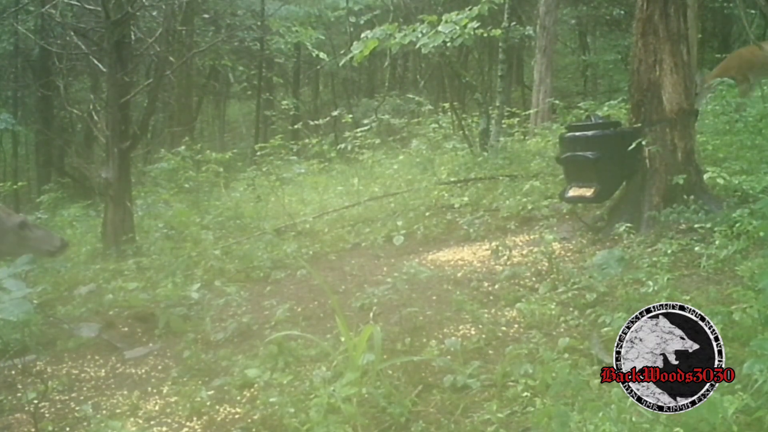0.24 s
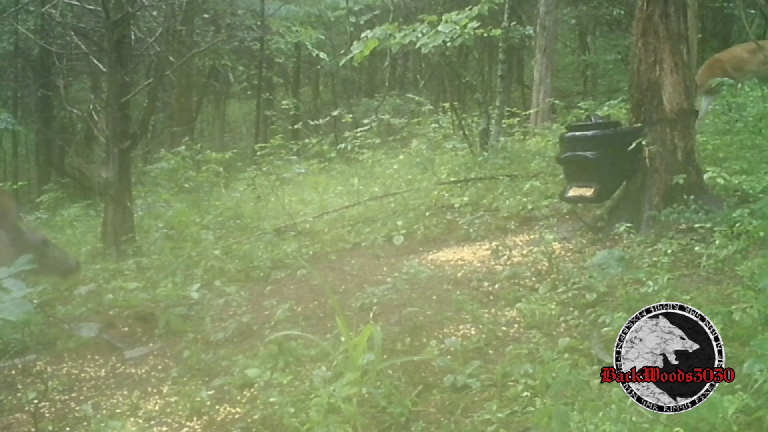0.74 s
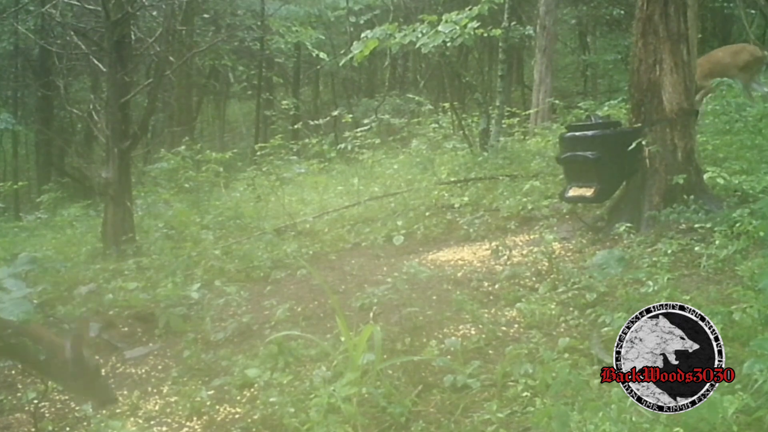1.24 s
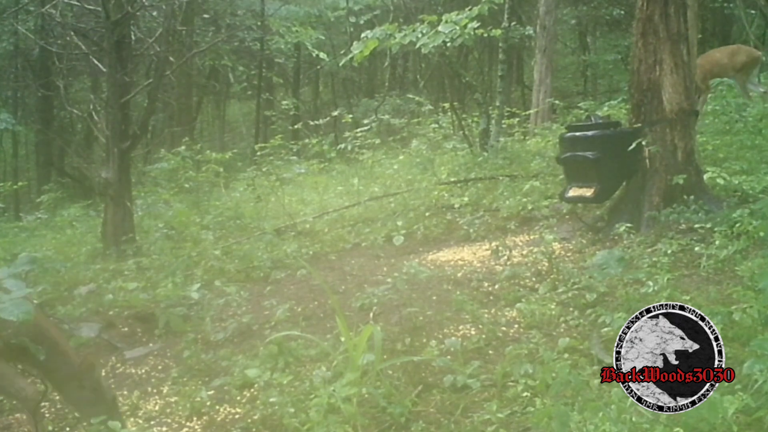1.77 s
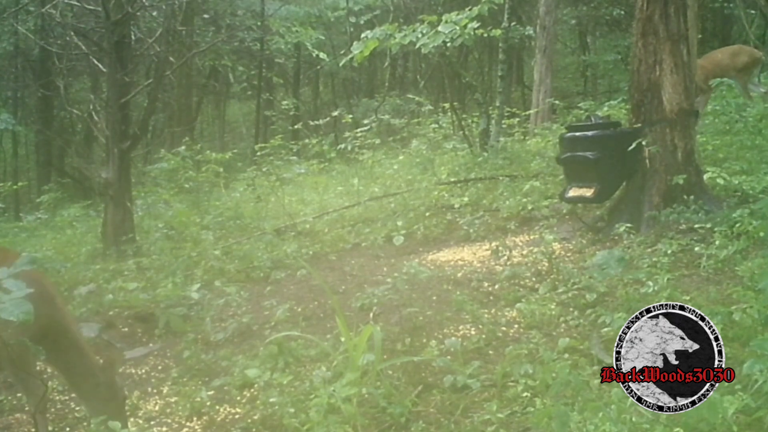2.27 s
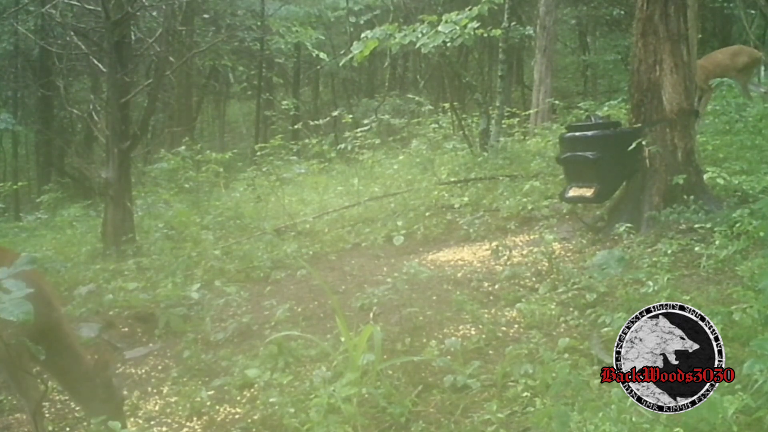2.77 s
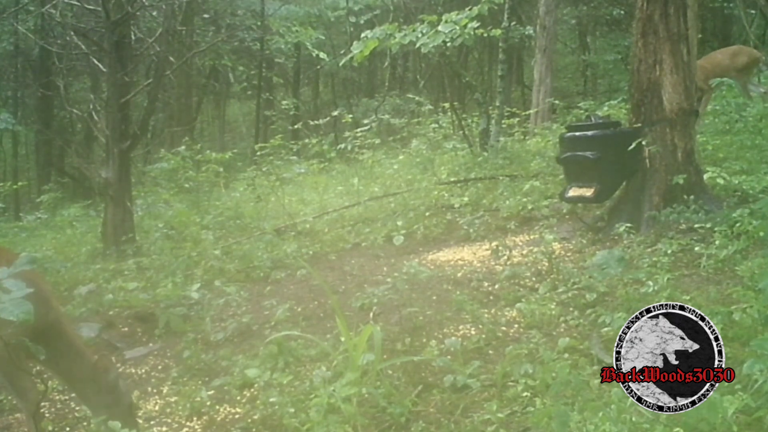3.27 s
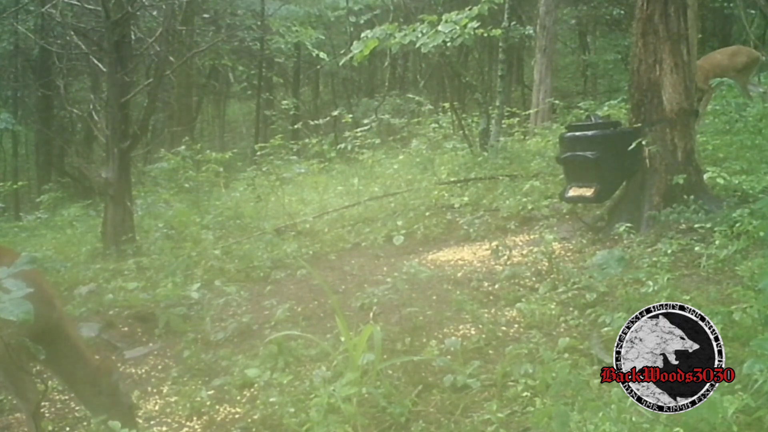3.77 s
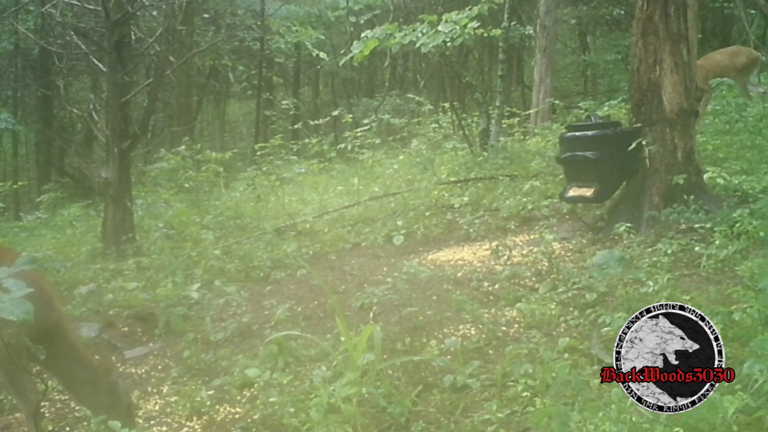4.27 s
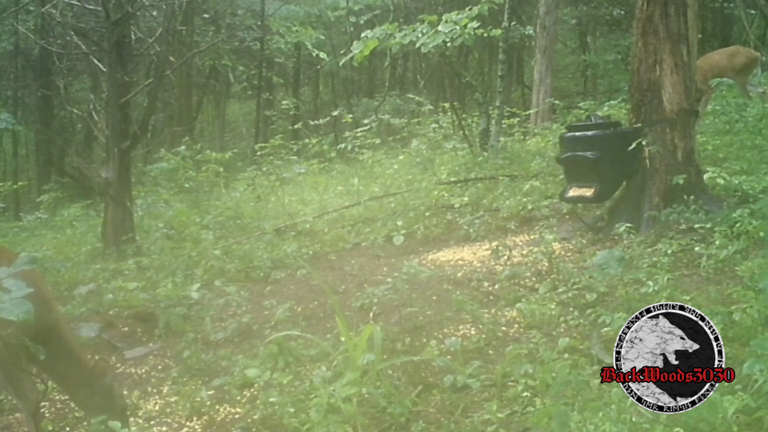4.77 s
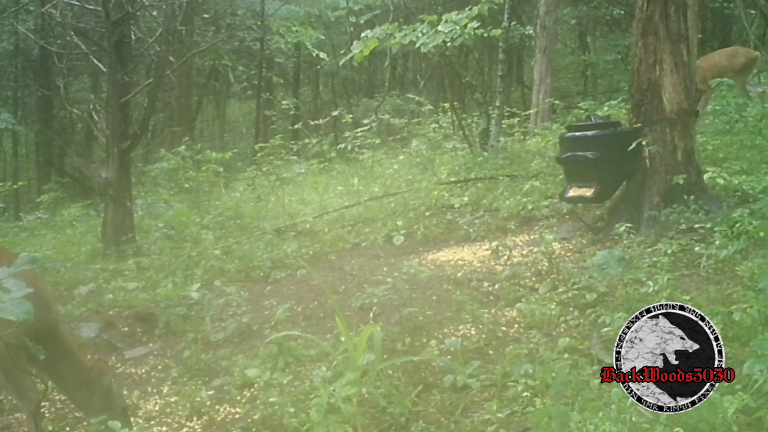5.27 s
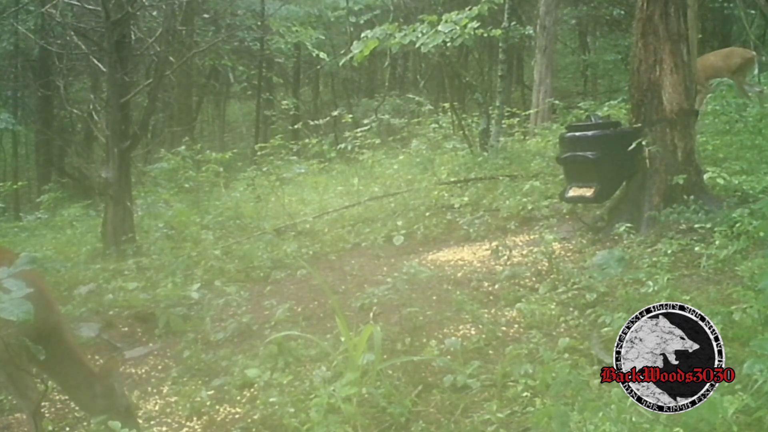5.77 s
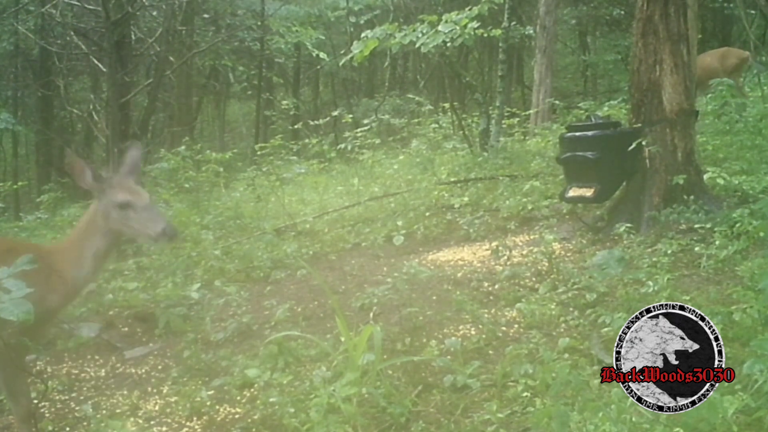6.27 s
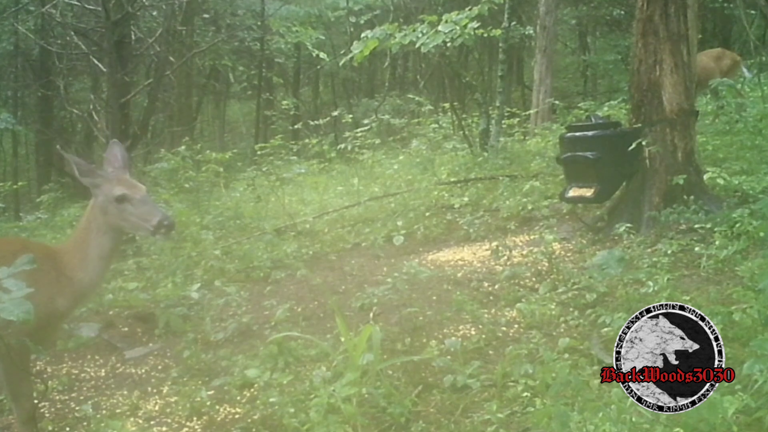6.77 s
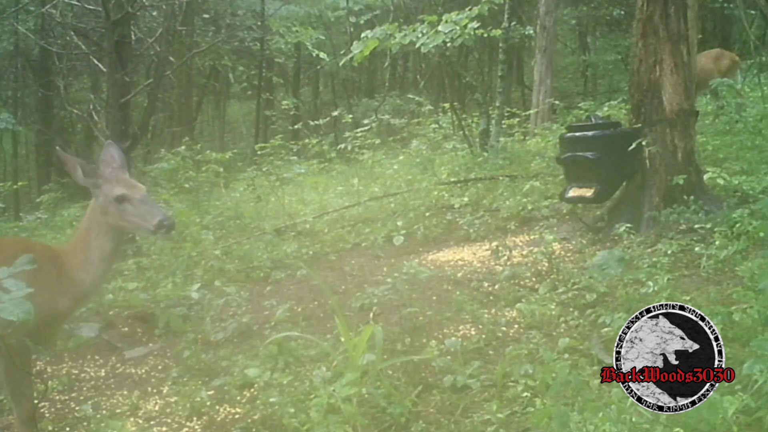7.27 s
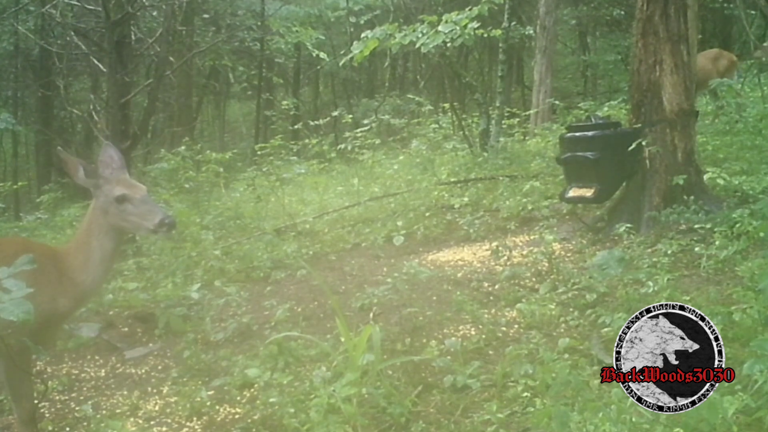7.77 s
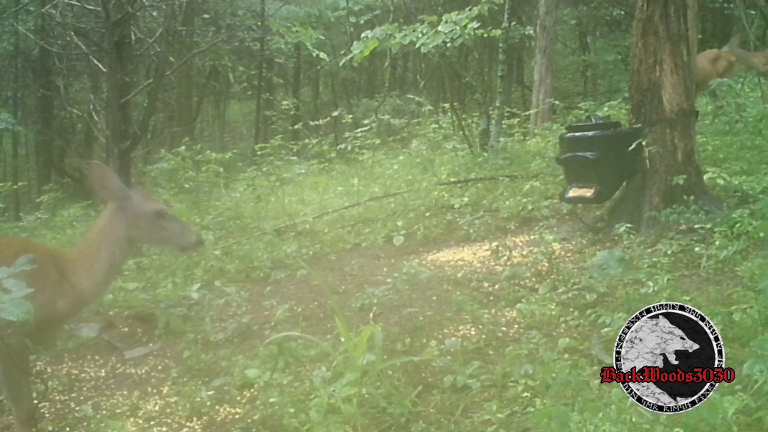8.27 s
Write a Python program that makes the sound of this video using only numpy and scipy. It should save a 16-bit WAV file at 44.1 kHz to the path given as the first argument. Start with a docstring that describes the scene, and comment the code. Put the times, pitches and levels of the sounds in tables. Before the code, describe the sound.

Heard from inside a plastic housing strapped to a tree: dense rain patter on leaves, dull and slightly muffled, with scattered sharp plops. An early cluster of very loud, distorted plastic knocks stands out, then clear rising bird whistles and a fast repeated trill with woodland echo. Faint far notes and a brief distant buzz pass, a lighter knock lands midway, and the birds call again near the close.

```python
"""Woodland in steady rain, heard by a microphone in a plastic housing strapped to a tree.
Drops are impulses and noise bursts filtered to leaf pitches, over a wash of shaped noise.
Big drips excite the damped modes of the housing, and the strongest overload the input.
Birds are frequency-modulated sines: a near whistler, a trill, far notes and rising chips.
Random decaying taps add echoes among the trunks; a faint far buzz is throbbing band noise."""
import sys
import numpy as np
from scipy import signal
from scipy.fft import rfft, irfft
from scipy.io import wavfile
from scipy.ndimage import uniform_filter1d

SR = 44100
rng = np.random.default_rng(int(sys.argv[2]) if len(sys.argv) > 2 else 0)


def bounce(signal):
    """Save signal as a 16-bit WAV file at the path given by the first command-line argument."""
    frames = np.transpose(np.atleast_2d(signal))
    limited = np.clip(frames, -1, 1)
    pcm = np.round(limited * 32767).astype(np.int16)
    wavfile.write(sys.argv[1], SR, pcm)


N = 375291  # length [samples]


def gain_of(db):
    """Logarithmic level: converts decibels to an amplitude ratio."""
    return 10 ** (np.asarray(db) / 20)


def evened(x):
    """Power normalisation: scales a signal to rms 1."""
    return x / np.sqrt(np.mean(x ** 2) + 1e-20)


def read(points, hz):
    """Interpolation on a log-frequency axis of a table of (frequency, value)."""
    point_hz, value = np.transpose(points)
    return np.interp(np.log(hz + 1), np.log(point_hz + 1), value)


def add(mix, s, sound):
    """Superposition: adds a sound to the mix at s seconds, cut at the end of the mix."""
    part = mix[round(s * SR):][:len(sound)]
    part += sound[:len(part)]


def band(x, lo_hz, hi_hz):
    """Causal Butterworth band-pass along the last axis."""
    sos = signal.butter(2, [lo_hz, hi_hz], "bandpass", fs=SR, output="sos")
    return signal.sosfilt(sos, x)


def drop(hz, splash_db, thud_db, t60, noise):
    """Impulse excitation: a tick and decaying spatter drive a leaf ring, a bright splash and a dull thud."""
    leaf_dull_hz, ring_octaves = 4200, 0.49  # low-pass of ring and thud; reach of the ring below hz
    t = np.arange(len(noise)) / SR
    hit = 0.13 * noise * gain_of(-60 * t / max(t60, .003))
    hit[0] = 1  # the tick
    dull = signal.lfilter(*signal.butter(2, leaf_dull_hz, fs=SR), hit)
    ring = band(dull, hz / 2 ** ring_octaves, hz * 1.11)
    splash = band(hit, 3500, 7500)
    thud = band(dull, 408, 1950)
    leaf = ring / abs(ring).max()
    return leaf + gain_of(splash_db) * evened(splash) + gain_of(thud_db) * evened(thud)


def near_drops():
    """Discrete impacts: the loudest single drops, on near leaves."""
    # Drops on near leaves: (time [s], ring peak level [dB], ring pitch [Hz],
    # treble splash level [dB rms], low thud level [dB rms])
    drops = [(0.0814, -27, 2720, -70, -63), (0.3519, -20.5, 2620, -60, -47),
             (0.7286, -27, 2840, -65, -45.5), (0.7977, -27, 3040, -58, -42.5),
             (0.9291, -37, 2900, -66, -46), (1.055, -28, 3000, -73, -52), (1.1124, -45, 2330, -74, -47.5),
             (1.1808, -27, 2630, -73, -47), (1.3198, -20.5, 2740, -71, -45), (1.3946, -25, 2630, -61, -52),
             (1.54, -26, 2280, -59, -42), (1.7472, -51, 2180, -62, -47.5), (2.0012, -29, 2700, -68, -46),
             (2.0921, -23, 2760, -55.5, -53), (2.159, -29, 2900, -65, -52), (2.2548, -38, 2770, -66, -57),
             (2.3777, -22, 3230, -59, -49), (2.4864, -50, 3300, -63, -51), (2.5052, -39, 3200, -57, -35.5),
             (2.6458, -43, 3240, -71, -48), (2.7637, -27, 1850, -73, -45), (2.7925, -23, 2740, -75, -44),
             (2.8398, -30, 1890, -72, -53), (2.9026, -29, 3000, -68, -60), (3.0834, -24, 3000, -55, -45.5),
             (3.2984, -24.5, 3100, -60, -46.5), (3.416, -24, 2900, -69, -46),
             (3.8598, -31, 2500, -65, -48.5), (4.2138, -35, 2520, -73, -48), (4.279, -36, 2410, -58, -50),
             (4.2941, -16.5, 3080, -67, -41), (4.342, -32, 1930, -72, -49), (4.3657, -32, 2780, -68, -53),
             (4.5032, -31, 2740, -75, -52), (4.832, -44, 3090, -67, -48.5), (5.346, -35, 2950, -68, -53),
             (5.5623, -32, 3030, -63, -45.5), (5.7909, -24, 2240, -59, -37), (5.8025, -26, 2830, -58, -52),
             (5.9391, -17.5, 2280, -72, -41.5), (5.9908, -34, 2910, -72, -52),
             (6.0427, -45, 3070, -67, -46.5), (6.1, -27, 2760, -68, -46), (6.194, -29, 2910, -70, -58),
             (6.3538, -25.5, 2900, -58, -47), (6.6249, -34, 2540, -64, -49), (6.9432, -28, 2400, -70, -48),
             (7.5517, -19.5, 3120, -70, -44), (7.5661, -24, 2130, -67, -38)]
    out = np.zeros(N)
    noise = rng.standard_normal((len(drops), 800))
    for (s, db, hz, splash_db, thud_db), row in zip(drops, noise):
        sound = drop(hz, splash_db - db, thud_db - db, t60=0.013, noise=row)
        add(out, s, gain_of(db) * sound)
    return out


def patter(per_s, db, spread_db, count=24):
    """Random arrivals: small drops, a few of them large, each convolved with one of count leaf sounds."""
    arrives = rng.random(N) < per_s / SR
    size = gain_of(db + spread_db * np.minimum(rng.exponential(1, N), 4)) * arrives
    leaf = rng.integers(0, count, N)
    high_hz, low_hz = rng.uniform(2550, 3100, count), rng.uniform(705, 1900, count)
    pitch = np.where(rng.random(count) < .8, high_hz, low_hz)
    out = np.zeros(N)
    for k, hz in enumerate(pitch):
        tap = drop(hz, splash_db=-71, thud_db=-16.0, t60=0.025, noise=rng.standard_normal(800))
        out += signal.oaconvolve(size * (leaf == k), tap)[:N]
    return out


def housing():
    """Modal synthesis: each contact is a short splat that rings the housing; a big drip makes several."""
    # Contacts of drips on the housing: (time [s], knock peak level [dB],
    # spectral tilt about 2 kHz [dB per octave], best-struck mode [Hz], its lift [dB],
    # initial spray level relative to the knock peak [dB rms])
    contacts = [(0.757, -32, 2, 575, 16.5, -35), (0.933, -37, -3.5, 474, 22, -35),
                (1, -36, -4, 1265, 15, -35), (1.171, -32, 1.5, 575, 23, -35), (1.489, -26, 0, 2000, 6, -25),
                (1.5104, 12, 2, 3200, 11.5, -35), (1.513, 5.5, -2, 1088, 6.5, -35),
                (1.5155, -4.5, 12, 1790, 4, -25), (1.6134, -6, 0, 3200, 14, -18.5),
                (1.6154, -8, 5.5, 2340, 4, -42), (1.6945, 2, -3, 2670, 9, -17),
                (1.6962, -5.5, -2, 1265, 20, -29), (1.792, -31.5, -4, 1010, 12, -14),
                (2.392, -19.5, 1, 1265, 13.5, -30), (2.554, -26.5, -2.5, 575, 2, -35),
                (2.984, -32.5, -4.5, 1088, 9, -35), (3.069, -33, -1, 575, 12, -37),
                (3.95, -35, -0.5, 575, 20, -35), (5.0934, -19.5, -5, 3200, 12, -15.5),
                (5.0994, -11, -4.5, 752, 19, -21), (5.1002, -17.5, -6.5, 2500, 26, -39),
                (5.519, -38, -6, 575, 17, -35), (6.494, -39, -7, 575, 7, -41)]
    # Damped modes of the housing: (frequency [Hz], relative level [dB], decay time t60 [s])
    modes = [(270.4, -31, 0.5), (474, -16, 0.134), (575, -2.5, 0.098), (698, -3, 0.045), (770, -18, 0.092),
             (807, -14, 0.046), (1310, 5.5, 0.0187), (3900, -32, .015), (1088, 5.5, 0.036),
             (1265, -14, 0.13), (1530, 12.5, 0.013), (1670, -3, 0.043), (1790, 4, 0.037), (2340, -4, 0.036),
             (2500, 6.5, 0.024), (2700, 0.5, 0.0083), (2790, 9, 0.015), (3027, -23, 0.0098),
             (3200, 14.5, 0.011), (3580, -12, 0.036), (4290, 2, 0.018), (3000, 16.5, 0.016),
             (1900, -12, 0.026)]
    splat_s = 0.0017  # decay constant of the splat
    thump_db, thump_s = -26, 0.00086  # scale of a pulse shape that peaks near 0.46; its time constant
    out, t = np.zeros(N), np.arange(SR // 4) / SR
    noise = rng.standard_normal((len(contacts), 600))
    for (s, db, tilt, struck_hz, lift_db, spray_db), row in zip(contacts, noise):
        ring = np.zeros(len(t))
        for k, (hz, level_db, t60) in enumerate(modes):
            # the spot struck favours some modes
            near_db = lift_db * np.exp(-(np.log2(hz / struck_hz) / 0.094) ** 2)
            sign = (-1) ** k if hz < 2100 else 1  # low modes alternate in sign along the table
            height = sign * gain_of(level_db + near_db + tilt * np.log2(hz / 2000))
            ring += height * gain_of(-60 * t / t60) * np.sin(2 * np.pi * hz * t)
        splat = 1.1 * row * np.exp(-t[:600] / splat_s) / np.sqrt(splat_s * SR)
        splat[0] = 1  # the splat opens with one sharp tick
        soft_ring = ring * (1 - np.exp(-t / 0.00028))  # water lands softly
        knock = signal.oaconvolve(soft_ring, splat)
        spray = evened(band(row, 2400, 5600)) * gain_of(spray_db - 60 * t[:600] / 0.016)
        # the whole housing is pushed back
        thump = (t / thump_s) * (2 - t / thump_s) * np.exp(-t / thump_s)
        add(out, s, gain_of(db) * knock / abs(knock).max())
        add(out, s, gain_of(db) * spray)
        add(out, s, gain_of(db + thump_db) * thump)
    return out


def whistle(rows, edge):
    """Frequency modulation: a sine follows rows of (time [s], pitch [Hz], level [dB rms])."""
    s, hz, db = np.transpose(rows)
    t = np.arange(s[0], s[-1], 1 / SR)
    tone = np.sin(2 * np.pi * np.cumsum(np.interp(t, s, hz)) / SR)
    envelope = np.sqrt(2) * gain_of(np.interp(t, s, db))
    return s[0], envelope * tone * signal.windows.tukey(len(t), edge)


def near_bird():
    """Pitch glides: whistles scoop up, slide to a held pitch and fade a little; two quick flicks fall."""
    # Whistles: (start [s], length [s], level [dB rms], first pitch [Hz], held pitch [Hz],
    # slide time [s], change of level by the end [dB])
    whistles = [(2.364, .135, -33, 3270, 3520, .09, -9), (2.503, .25, -38, 3300, 3570, .03, -8),
                (7.514, .255, -35, 3300, 3670, .14, -7)]
    # Falling flicks: (start [s], level at the start [dB rms])
    flicks = [(2.613, -43), (7.76, -44)]
    scoop_hz, scoop_s, rise_s = 390, 0.0056, 0.016  # depth and time constant of the scoop; onset
    sag_hz_per_s, vibrato_hz, vibrato_per_s = 180, 14, 23  # the held pitch sinks and wavers
    flick_from_hz, flick_to_hz, flick_s, flick_swell_db = 3500, 2500, 0.0109, 6
    out = np.zeros(N)
    for s, length, db, first_hz, held_hz, slide_s, fade_db in whistles:
        t = np.arange(0, length, .002)
        slide = np.sin(np.pi / 2 * np.minimum(t / slide_s, 1)) ** 2
        hz = first_hz + (held_hz - first_hz) * slide - scoop_hz * np.exp(-t / scoop_s)
        hz += vibrato_hz * np.sin(2 * np.pi * (vibrato_per_s * t + rng.random()))
        hz -= sag_hz_per_s * t
        level_db = db + fade_db * t / length + 20 * np.log10(np.clip(t / rise_s, .1, 1))
        add(out, *whistle(np.transpose([s + t, hz, level_db]), edge=0.027))
    for s, db in flicks:
        flick = [(s, flick_from_hz, db), (s + flick_s, flick_to_hz, db + flick_swell_db)]
        add(out, *whistle(flick, edge=0.19))
    return out


def trill(strokes):
    """Periodic repetition of a syllable: a short high note, a fast fall, a low upstroke."""
    # Three strokes of a syllable, each a list of
    # (time from syllable start [s], mean pitch [Hz], level relative to the effort [dB])
    syllable = [
        [(-.028, 4880, -1), (-.015, 5050, -17), (0, 5200, -12)],
        [(0, 7300, -14), (.013, 6300, -2.5), (.021, 5200, 1), (.025, 3900, 10.5), (.032, 2980, -7)],
        [(.038, 2394, 0), (.045, 2782, 11), (.052, 3200, 10), (.06, 3290, 13)],
    ]
    # Trills: (first syllable [s], effort [dB], syllables [count], of them with an upstroke [count])
    trills = [(2.982, -54, 7, 6), (8.134, -55, 4, 4)]
    syllable_s = .0935  # spacing of syllables
    tiring_db, upstroke_db = -0.47, 4  # change per syllable, lift of the upstroke
    out = np.zeros(N)
    for first, effort_db, syllables, closed in trills:
        for n in range(round(syllables)):
            for k in strokes:
                waver = [1, rng.normal(1, 0.015), 1]  # no two strokes have quite the same pitch
                start, tone = whistle(np.array(syllable[k]) * waver, edge=0.12)
                level_db = effort_db + n * tiring_db + upstroke_db * (k == 2)
                if k < 2 or n < round(closed):
                    add(out, first + n * syllable_s + start, gain_of(level_db) * tone)
    return out


def far_birds():
    """Slow frequency modulation: faint even notes slide through three pitches."""
    # Far notes: (start [s], length [s], level [dB rms], pitch at start, middle and end [Hz])
    notes = [(2.759, 0.12, -48, 1845, 1897, 1900), (4.05, 0.19, -50, 2660, 2520, 2500),
             (4.46, .07, -70, 5890, 5780, 5640), (7.89, .13, -50.5, 1860, 1918, 1800),
             (8.0, 0.086, -47.5, 1345, 1693, 1700), (8.064, 0.0806, -48, 1592, 1420, 1339),
             (8.16, 0.049, -50, 1358, 1335, 1220), (8.478, 0.037, -49, 1370, 1520, 1660)]
    out = np.zeros(N)
    for s, length, db, *pitches in notes:
        rows = [(s + k * length / 2, hz, db) for k, hz in enumerate(pitches)]
        add(out, *whistle(rows, edge=0.14))
    return out


def chips():
    """Rapid upward chirps: thin steep rises, loudest a third of the way, mostly heard as echoes."""
    # Chips: (start [s], length [s], loudest level [dB rms], end pitch [Hz])
    chirps = [(4.228, .035, -61, 7860), (8.068, .029, -56, 8000)]
    from_hz, ends_db = 5600, -12  # start pitch; level at both ends relative to the loudest
    out = np.zeros(N)
    for s, length, db, end_hz in chirps:
        rows = [(s, from_hz, db + ends_db),
                (s + length / 3, (from_hz + end_hz) / 2, db),
                (s + length, end_hz, db + ends_db)]
        add(out, *whistle(rows, edge=0.04))
    return out


def woods(x, wet_db):
    """Multiple scattering by trunks: taps of random sign, decaying at a rate that depends on frequency."""
    # Echoes last longest up to 1 kHz, shortest near 3.5 kHz, a little longer at 7 kHz:
    # (frequency [Hz], decay time t60 [s])
    decay = [(1000, 3.2), (3500, 0.65), (7000, 0.91)]
    taps = np.zeros(SR)
    at = np.arange(300, SR - 20, 20) + rng.integers(0, 20, (SR - 301) // 20)
    taps[at] = rng.choice([-1., 1.], len(at))
    hz, t, z = signal.stft(taps, SR, nperseg=256)
    fading = gain_of(-60 * t / read(decay, hz)[:, None])
    tail = signal.istft(z * fading, SR, nperseg=256)[1]
    echoes = signal.fftconvolve(x, tail / np.linalg.norm(tail))[:N]
    return x + gain_of(wet_db) * echoes


def buzz():
    """Amplitude modulation: a distant insect or bird, blurred to a band of throbbing hiss."""
    # Start, loudest moment and end of the buzz: (time [s])
    times = (4.55, 4.85, 5.05)
    lo_hz, hi_hz, loudest_db, ends_db = 4260, 5200, -64, -73
    t = np.arange(N) / SR
    hiss = band(band(rng.standard_normal(N), lo_hz, hi_hz), lo_hz, hi_hz)
    throb = 1 + 0.21 * np.sin(2 * np.pi * 24 * t)
    level_db = np.interp(t, times, [ends_db, loudest_db, ends_db], left=-120, right=-120)
    return evened(hiss) * throb * gain_of(level_db)


def wash(patchy_db, flicker_db):
    """Noise by random short-time spectra: countless far drops, with drifting patches and shared flicker."""
    # Rain wash and microphone hiss: (frequency [Hz], relative spectral level [dB per Hz])
    spectrum = [(15, -48), (25, 0.5), (102, 1), (137, -0.5), (223, -9), (463, -7), (677, -8.5), (840, -9),
                (2110, -8.5), (2990, -4.5), (5280, -29.5), (8830, -34), (14400, -37.5), (16000, -37)]
    frames, hz = N // 128 + 5, np.fft.rfftfreq(512, 1 / SR)
    a, b, patches = rng.standard_normal((frames, 257, 3)).T
    patches = uniform_filter1d(patches, size=6, axis=0)  # across frequency
    patches = evened(uniform_filter1d(patches, size=12, axis=1))  # across time
    # all bins flicker together, less below 2 kHz
    flicker = rng.standard_normal(frames) * np.clip(hz / 2000, 0, 1)[:, None]
    z = (a + 1j * b) * gain_of(patchy_db * patches + flicker_db * flicker)
    noise = signal.istft(z, nperseg=512, noverlap=384)[1][:N]
    colour = gain_of(read(spectrum, np.fft.rfftfreq(N, 1 / SR)))
    noise = irfft(rfft(noise) * colour, N)
    return evened(noise) * gain_of(-44.5)  # rms level


def scene():
    """Linear superposition of rain, drips and birds at one microphone."""
    rain = wash(patchy_db=1.12, flicker_db=1.63)
    rain += patter(per_s=250, db=-57.0, spread_db=4.5)
    rain += near_drops()
    birds = woods(near_bird(), wet_db=3.2) + buzz()
    birds += woods(far_birds(), wet_db=-3)
    birds += woods(chips(), wet_db=3)
    # leaves scatter the high strokes more than the low one
    birds += woods(trill(strokes=(0, 1)), wet_db=6.5)
    birds += woods(trill(strokes=(2,)), wet_db=1.5)
    return (rain + housing() + birds)[None]


def record(dry):
    """Hard clipping: the input overloads on the loudest drips; a linear-phase low-pass limits the band."""
    overload, edge_hz = .73, 15900  # clipping amplitude; band edge
    clipped = np.clip(dry, -overload, overload)
    low_pass = signal.firwin(511, edge_hz, window=("kaiser", 9), fs=SR)
    return signal.oaconvolve(clipped, low_pass[None], "same")


dry = scene()
out = record(dry)
bounce(out)
```